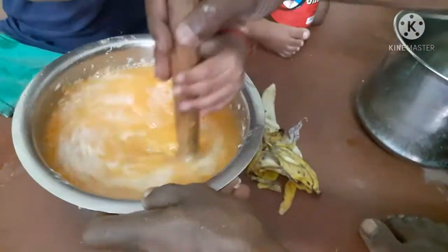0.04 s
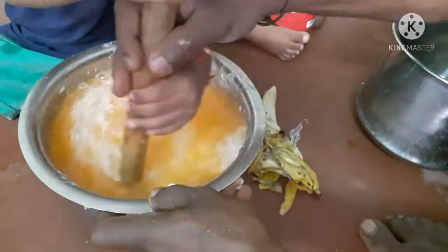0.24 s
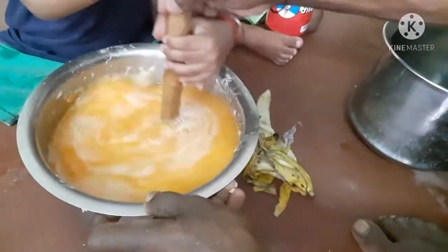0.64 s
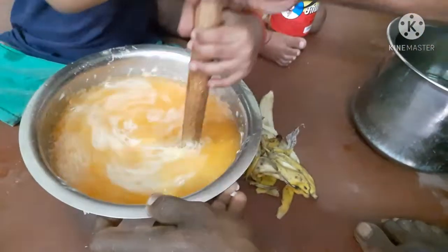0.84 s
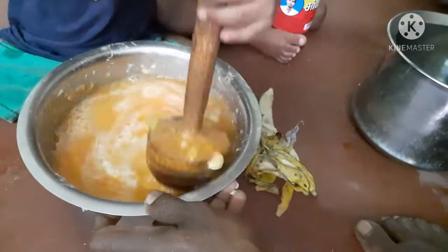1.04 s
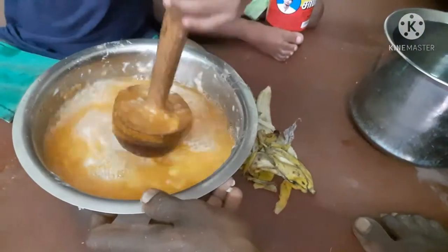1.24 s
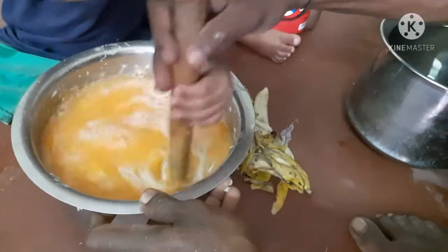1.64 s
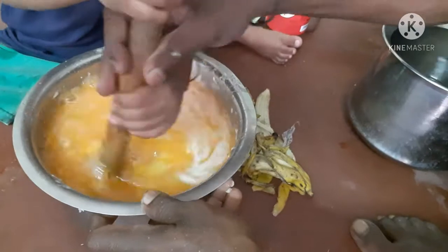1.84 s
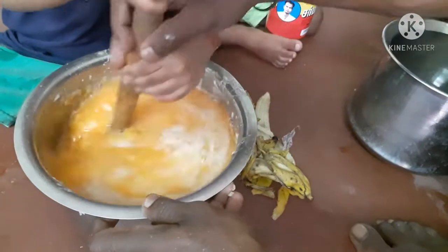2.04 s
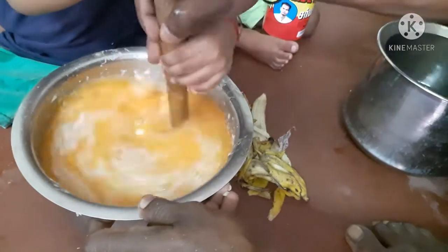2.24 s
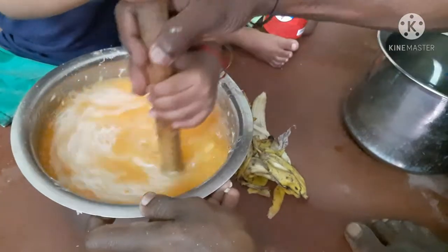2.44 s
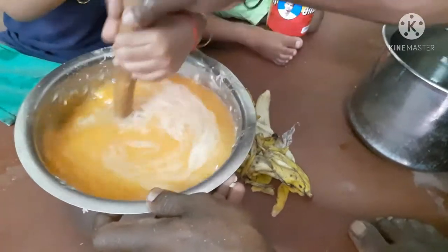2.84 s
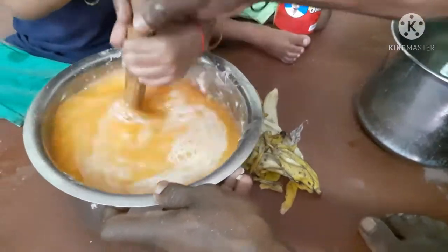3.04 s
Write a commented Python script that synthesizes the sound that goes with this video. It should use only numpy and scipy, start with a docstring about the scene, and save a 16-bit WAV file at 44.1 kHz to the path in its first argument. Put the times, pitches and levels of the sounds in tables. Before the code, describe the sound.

Wet mashing in a metal bowl: one sharp knock, then soft thuds, over distant traffic.

```python
"""Mashing in a metal bowl

A wooden masher works through thick liquid: one hard knock, then cushioned thuds, soft gulps of air
and a few wet clicks as the head lifts out. The full bowl rings low and briefly in a kitchen.
Behind it are low drones, like engines through the walls, and traffic that swells after the first second."""
import sys
import numpy as np
from scipy import signal
from scipy.fft import rfft, irfft
from scipy.io import wavfile
from scipy.ndimage import uniform_filter1d

SR = 44100
rng = np.random.default_rng(int(sys.argv[2]) if len(sys.argv) > 2 else 0)


def transcribe(u):
    """Save the signal u as a 16-bit wav file named by the first command-line argument.

    u: samples, shape (n,) or (channels, n), limited to [-1, 1]; the rate is SR.
    q: integer samples, one column per channel.
    """
    v = np.clip(np.atleast_2d(u).T, -1, 1)
    q = np.round(v * 32767).astype(np.int16)
    wavfile.write(sys.argv[1], SR, q)


N = 141120
SIDES = np.array([[.5], [-.5]])  # splits a left-right gap

# Modes of the filled bowl. Each row: frequency in Hz, level in dB, T60 in seconds.
BOWL_MODES = [(287.8, 0.5, 0.14), (358, -16, 0.15), (318, -2, 0.039), (443, -16, 0.06), (540, -10.5, 0.079),
              (652, -4.5, 0.048), (893, -11, 0.041), (1087, -20, 0.053), (1205, -22.5, 0.048),
              (1415, -29, .05), (1613, -20.5, .04)]


def knock():
    """Wood strikes metal: a light touch rings the bowl, then the head lands with a crack."""
    # Each row: start in seconds, level in dB.
    blows = [(0.0566, -3.5)]
    # Wooden head. Each row: frequency in Hz, level in dB, T60 in seconds.
    wood_modes = [(1530, -11.5, 0.019), (1900, -9, 0.019), (2000, -16, 0.015), (2320, -26, 0.019),
                  (3080, -21, 0.013), (4630, -24, 0.011), (7340, -35, .006)]
    # Each row: frequency in Hz, relative density in dB.
    crack_spectrum = [(200, -16), (700, -4.5), (1200, -1), (1850, 3.5), (2700, -6), (3700, -16),
                      (4600, -9.5), (6500, -21), (7600, -20.5), (9500, -29.5), (12000, -26), (16000, -27)]
    lag_s, contact_s = 0.002414, 0.0019
    crack = undb(-17.5) * noise(crack_spectrum)
    out = 0
    for touch_s, db in blows:
        land_s = touch_s + lag_s
        contact = undb(-1.5) * burst(touch_s, contact_s) + burst(land_s, contact_s)
        bowl = ring(BOWL_MODES, touch_s, rise_s=0.0012)
        head = ring(wood_modes, land_s, rise_s=0.00058)
        out += undb(db) * (bowl + head + crack * contact)
    return out


def thuds():
    """Liquid cushions the blows: the bowl's ring rises slowly and loses its upper modes."""
    # Each row: start in seconds, level in dB, pitch ratio, share of the bowl's T60.
    blows = [(1.001, -15, 0.91, .25), (1.012, -13.5, 1.33, 0.23), (1.026, -17, 1.15, 0.27),
             (1.6036, -4.5, 1.08, .26), (1.6135, -12, 0.94, 0.38), (1.862, -9, 1.03, 0.43),
             (1.887, -15.5, 1.1, .45), (1.93, -17, 1.01, 0.37), (2.008, -18, 0.95, 0.58),
             (2.3724, 0, 1.06, 0.26)]
    return sum(undb(db) * ring(BOWL_MODES, start_s, 0.0045, t60_share, pitch, dull_db_per_oct=28)
               for start_s, db, pitch, t60_share in blows)


def ring(modes, start_s, rise_s, t60_share=1, pitch=1, dull_db_per_oct=0):
    """Decaying modes after one blow, each with a phase gap between the sides."""
    t = np.arange(SR // 3) / SR
    y = 0
    for k, (hz, db, t60_s) in enumerate(modes):
        phase_rad = (-1) ** k * 0.74 * np.sqrt(hz / 1000) * SIDES
        gain = undb(db - dull_db_per_oct * np.log2(hz / modes[0][0]))
        decay = np.exp(-np.log(1000) * t / (t60_s * t60_share))
        y += gain * np.sin(2 * np.pi * hz * pitch * t + phase_rad) * decay
    y *= 1 - np.exp(-(t / rise_s) ** 2)
    return np.array([np.interp(since(start_s), t, side, right=0) for side in y])


def churning():
    """Air pockets gulp behind the masher: a few low cycles each, at random moments."""
    # Stirring strength. Each row: time in seconds, relative level in dB.
    stirring = [(0, -34), (.8, -38), (1.2, -44), (1.6, -32), (2.0, -28.5), (2.6, -30.5), (3.2, -32.5)]
    gulps_per_s, centre_hz, rise_cycles = 70, 283.3, 1.75
    scatter_oct, scatter_db = 0.4, 2
    t = np.arange(SR // 10) / SR
    out = np.zeros(N + len(t))
    for when, pitch, size in rng.random((int(gulps_per_s * N / SR), 3)):
        i = int(when * N)
        cycles = centre_hz * 2 ** (scatter_oct * (2 * pitch - 1)) * t
        age = cycles / rise_cycles
        envelope = undb(scatter_db * (2 * size - 1)) * age * np.exp(1 - age)
        out[i:i + len(t)] += envelope * np.sin(2 * np.pi * cycles)
    return out[:N] * undb(curve(stirring)) / 2


def wet_clicks():
    """Liquid films snap: a short noise burst around one pitch, with a little spray above."""
    # Each row: start in seconds, level in dB, centre in Hz, width in octaves, relative spray in dB.
    snaps = [(1.0995, -47, 9090, 0.5, -10), (1.1045, -50, 7486, 0.36, -16), (1.3415, -36, 4300, 0.49, -21),
             (1.3476, -33.5, 4880, 0.42, -11), (1.3594, -27, 3230, 0.73, -19),
             (1.363, -37.5, 4850, 0.36, -12), (1.7236, -38, 4200, 0.17, -24),
             (3.099, -54, 12980, 0.26, -14)]
    grid_hz = np.geomspace(100, 16000, 80)
    out = 0
    for start_s, db, centre_hz, width_oct, spray_db in snaps:
        band = np.exp(-.5 * (np.log2(grid_hz / centre_hz) / width_oct) ** 2)
        spray = undb(spray_db) * grid_hz / (grid_hz + 1000)
        spectrum = np.c_[grid_hz, 20 * np.log10(band + spray)]
        out += undb(db) * burst(start_s, length_s=0.0017) * noise(spectrum)
    return out


def kitchen(x):
    """The walls add a short, dull tail."""
    # Each row: frequency in Hz, relative density in dB.
    tail_spectrum = [(100, -16), (300, -4.5), (650, -3), (1200, 2.5), (2000, -6.5), (5000, -5.5),
                     (16000, -13.5)]
    t60_s, tail_db, lag_s, build_s = 0.13, -17, 0.0093, 0.0038
    decay = np.exp(-np.log(1000) * since(0) / t60_s)
    onset = 1 - np.exp(-since(lag_s) / build_s)
    tail = noise(tail_spectrum) * decay * onset
    tail /= np.sqrt(np.sum(tail ** 2) / 2)  # unit energy per side
    return x + undb(tail_db) * signal.fftconvolve(x, tail, axes=1)[:, :N]


def engine():
    """A distant engine gathers speed: unsteady partials of one cycle rate."""
    # Each row: time in seconds, cycle rate in Hz, level in dB.
    run = [(0, 20.8, -51), (.8, 22.1, -45.5), (1.2, 22.4, -44.5), (1.9, 23.2, -37), (2.3, 22.7, -36.5),
           (2.7, 24.2, -37.5), (2.95, 24.7, -37), (3.2, 25.6, -38.5)]
    # Each row: multiple of the rate, level in dB, level spread in dB, pitch drift as a share.
    orders = [(3, -12, 6.5, 0.0165), (6, -8.5, 7, .016), (9, -15, 2, 0.015), (12, -1.5, 2.5, 0.03025),
              (13, -10, 0.5, 0.0252)]
    rate_hz = curve(run)
    partials = sum(undb(db) * tone(k * rate_hz, rough_db, drift) for k, db, rough_db, drift in orders)
    return undb(curve(run, column=2)) * partials


def drones():
    """An engine-like drone, a partial of the distant engine that swells on its own, and a low hum waver and
    swell."""
    # Each row: time in seconds, frequency in Hz, level in dB.
    lower = [(0, 97.6, -33.5), (.2, 92.25, -52), (.34, 75.8, -30), (.47, 81.1, -36), (.58, 82.7, -30.5),
             (.76, 86.1, -46.5), (.88, 100.3, -32), (.98, 101.7, -32), (1.13, 100.1, -43),
             (1.25, 99.06, -33), (1.52, 103.5, -32.5), (1.75, 101, -38), (2.15, 98, -44.5),
             (2.38, 96.96, -29), (2.6, 96.88, -30.5), (2.85, 97.6, -36), (3.2, 93.8, -40)]
    upper = [(0, 153, -45), (.8, 156.4, -47), (1.4, 156.9, -42), (1.95, 163.2, -41.5), (2.1, 167.1, -37.5),
             (2.4, 167.1, -37.5), (2.75, 169.8, -35), (2.92, 169, -44.5), (3.2, 167.6, -50)]
    hum = [(0, 46, -45), (.4, 48.1, -36), (1.05, 50.5, -46), (1.6, 51.5, -43), (2.6, 54.65, -42.5),
           (3.2, 54.24, -42)]
    return sum(undb(curve(track, column=2)) * tone(curve(track), rough_db=1.07, drift=0.013)
               for track in (lower, upper, hum))


def traffic():
    """Low rumble, a wavering middle band and a diffuse road wash over a faint hiss."""
    # Each row: frequency in Hz, relative density in dB.
    rumble_spectrum = [(20, -28), (33, -6), (48, -20), (80, 1.5), (115, -2.5), (160, -1), (205, -9),
                       (290, -8.5), (360, -10.5), (450, -15.5), (600, -14.5), (800, -26), (1500, -55)]
    middle_spectrum = [(380, -17), (470, -1), (535, 8), (560, 8.5), (590, 9), (650, 1), (720, -3.5),
                       (900, -35)]
    wash_spectrum = [(300, -8.5), (600, -13.5), (780, -2), (1000, 1.5), (1300, -1), (1700, -5), (2250, -5),
                     (2800, -10.5), (3500, -13.5), (4300, -15.5), (5500, -19.5), (6600, -24.5), (7800, -28),
                     (8800, -33), (12000, -33), (15500, -55)]
    hiss_spectrum = [(1000, -18), (7800, 4.5), (8800, -4), (12500, -0.5), (16000, -14)]
    # Each row: time in seconds, level in dB.
    rumble_levels = [(0, -32), (.38, -35), (.7, -36), (1.1, -37), (1.5, -31.5), (2.0, -31), (2.6, -31.5),
                     (3.2, -33)]
    middle_levels = [(0, -41.5), (.28, -40), (.42, -37.5), (.49, -50), (.6, -46.5), (.7, -43), (.78, -52),
                     (1.2, -49.5), (3.2, -52.5)]
    wash_levels = [(0, -42), (.42, -42.5), (.5, -43.5), (.9, -46), (1.08, -43), (1.25, -41.5), (1.7, -40),
                   (2.1, -40.5), (2.7, -40.5), (3.2, -42)]
    hiss_levels = [(0, -61), (.9, -61), (1.6, -58), (2.5, -66.5), (3.2, -59.5)]
    rumble = noise(rumble_spectrum) * undb(curve(rumble_levels))
    middle = noise(middle_spectrum) * undb(curve(middle_levels))
    wash = noise(wash_spectrum) * undb(curve(wash_levels))
    hiss = noise(hiss_spectrum) * undb(curve(hiss_levels))
    return rumble + middle + wash + hiss


def tone(hz, rough_db, drift):
    """A sine, unsteady in level and pitch."""
    cycles = np.cumsum(hz * (1 + drift * walk(rate_hz=14))) / SR + rng.random()
    return np.sqrt(2) * np.sin(2 * np.pi * cycles) * undb(rough_db * walk(rate_hz=18))


def noise(spectrum):
    """Coloured stereo noise, rms 1, alike on both sides in the bass."""
    # Each row: frequency in Hz, left-right correlation.
    likeness = [(60, 0.98), (290, 0.6), (640, 0.8), (1000, 0.27), (1500, 0.03), (15000, -0.01)]
    alike = np.clip(per_bin(likeness), 0, 1)
    mid, side = rfft(rng.standard_normal((2, N)))
    mid, side = mid * np.sqrt(1 + alike), side * np.sqrt(1 - alike)
    y = irfft(np.array([mid + side, mid - side]) * undb(per_bin(spectrum)), N)
    return y / y.std()


def walk(rate_hz):
    """Random steps, smoothed twice; spread near 1."""
    hold = int(SR / rate_hz)
    steps = rng.standard_normal(512)[np.arange(N) // hold % 512]
    return 1.3 * uniform_filter1d(uniform_filter1d(steps, hold), hold)


def burst(start_s, length_s):
    """Envelope that peaks at 1 after half its length and dies away."""
    age = 2 * since(start_s) / length_s
    return age * np.exp(1 - age)


def since(start_s):
    """Seconds since a moment, zero before it."""
    return np.maximum(np.arange(N) / SR - start_s, 0)


def curve(rows, column=1):
    """One column of a time table, interpolated per sample."""
    rows = np.array(rows)
    return np.interp(np.arange(N) / SR, rows[:, 0], rows[:, column])


def per_bin(rows):
    """A frequency table, interpolated per FFT bin on a log axis."""
    hz, values = np.array(rows).T
    bin_hz = np.arange(N // 2 + 1) * SR / N
    return np.interp(np.log(bin_hz + 1), np.log(hz), values)


def undb(db):
    """Decibels to gain."""
    return 10 ** (np.asarray(db) / 20)


def scene():
    """The bowl close by; the street behind it, its bass leaning right."""
    # Each row: frequency in Hz, left minus right in dB.
    street_lean = [(60, -5.5), (110, -6), (200, 0), (700, -1.5), (3000, 1), (8000, -1.5), (15000, -1.5)]
    bowl_low_hz, bowl_pan_db = 184, -1.5
    # The small bowl radiates little bass.
    radiation = signal.butter(4, bowl_low_hz, "high", fs=SR, output="sos")
    blows = signal.sosfilt(radiation, knock() + thuds())
    bowl = kitchen(blows + churning() + wet_clicks()) * undb(bowl_pan_db * SIDES)
    street = engine() + drones() + traffic()
    return bowl + irfft(rfft(street) * undb(per_bin(street_lean) * SIDES), N)


def record(dry):
    """Low cut, clip at full scale, top cut."""
    low_hz, top_hz = 29, 15500
    low_cut = signal.butter(4, low_hz, "high", fs=SR, output="sos")
    top_cut = signal.ellip(10, .2, 80, top_hz, fs=SR, output="sos")
    clipped = np.clip(signal.sosfilt(low_cut, dry), -1, 1)
    return signal.sosfilt(top_cut, clipped)


dry = scene()
out = record(dry)
transcribe(out)
```